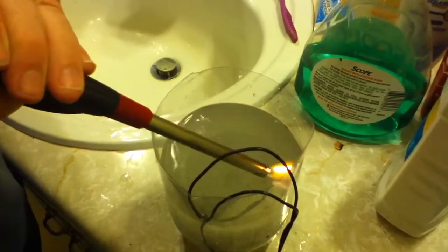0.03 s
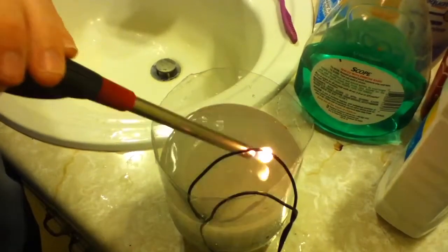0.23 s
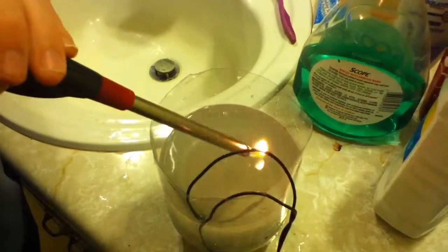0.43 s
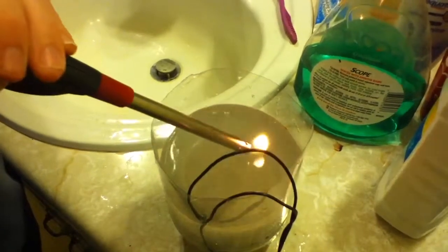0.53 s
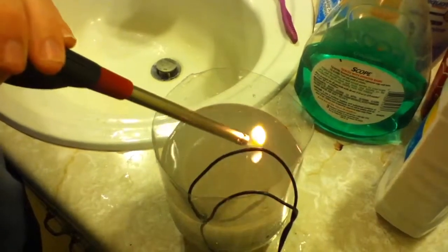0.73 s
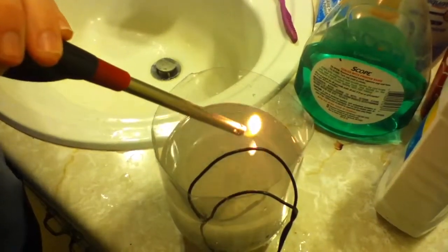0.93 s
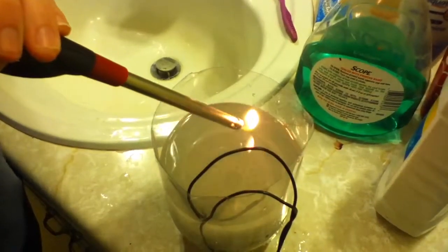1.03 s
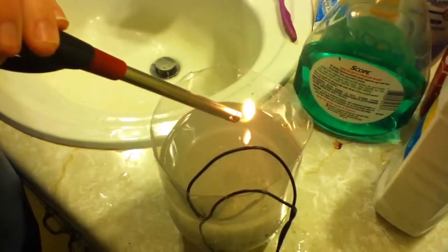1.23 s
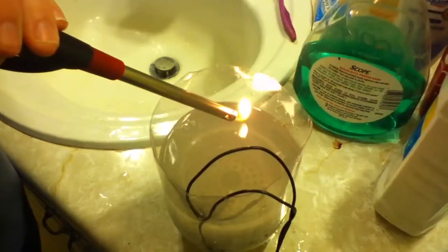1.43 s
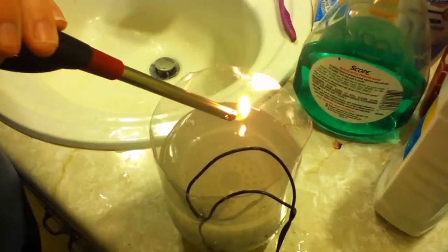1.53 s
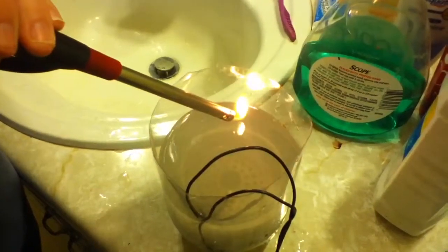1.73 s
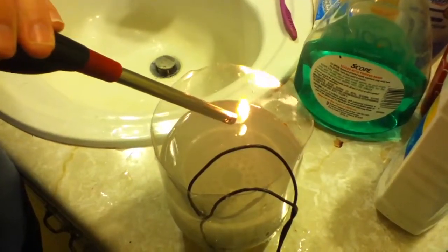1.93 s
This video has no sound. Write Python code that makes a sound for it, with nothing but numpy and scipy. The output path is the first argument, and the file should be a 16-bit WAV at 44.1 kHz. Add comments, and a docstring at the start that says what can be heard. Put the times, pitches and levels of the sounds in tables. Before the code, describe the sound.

One sharp gas bubble pop rings briefly in a small bathroom, followed by faint hiss.

```python
"""Hydrogen bubbles pop under a lighter flame in a plastic cup of water beside a bathroom sink.
Each pop is a brief pressure pulse that rings the cup and the small hard room.
Unlit bubbles fizz and tick faintly; a tiny one snaps near the end.
The loudest pop pushes the automatic gain down, and the hiss of flame and room creeps back."""
import sys
import numpy as np
from scipy import signal
from scipy.fft import rfft, irfft
from scipy.io import wavfile
from scipy.ndimage import uniform_filter1d, minimum_filter1d

SR = 44100
rng = np.random.default_rng(int(sys.argv[2]) if len(sys.argv) > 2 else 0)


def generate_wav(sig):
    """Save sig (samples, or channels by samples) to the path in sys.argv[1] as 16-bit PCM at SR."""
    pcm = np.round(np.clip(np.atleast_2d(sig).T, -1, 1) * 32767).astype(np.int16)
    wavfile.write(sys.argv[1], SR, pcm)


N = 88200
T = np.arange(N) / SR
FREQ_HZ = np.fft.rfftfreq(N, 1 / SR)


def amp(db):
    """Decibels to gain."""
    return 10 ** (np.asarray(db) / 20)


def fade(t60_s):
    """Exponential decay, 60 dB down at t60_s."""
    return np.exp(-np.log(1000) * T / t60_s)


def noise(spectrum):
    """Unit-rms noise shaped by (frequency [Hz], level [dB]) points."""
    hz, db = np.array(spectrum).T
    shape_db = np.interp(np.log(np.maximum(FREQ_HZ, 1)), np.log(hz), db)
    x = irfft(rfft(rng.standard_normal(N)) * amp(shape_db), N)
    return x / x.std()


def wander(rate_hz):
    """Slow random drift, spread near 1."""
    knots = rng.standard_normal(N // 100)
    return np.interp(T * rate_hz, np.arange(len(knots)), knots)


def ring(modes):
    """Decaying sines struck together."""
    return sum(amp(db) * np.sin(2 * np.pi * hz * T) * fade(t60_s) for hz, db, t60_s in modes)


def butter(x, order, hz, kind):
    """Butterworth filter."""
    return signal.sosfilt(signal.butter(order, hz, kind, fs=SR, output="sos"), x)


def at(x, start_s):
    """Shift to a start time."""
    return np.interp(np.arange(N) - round(start_s * SR), np.arange(N), x, left=0, right=0)


# igniting bubbles (time [s], level [dB], low-pass cutoff [Hz])
POPS = [(-0.03, -6.5, 3160), (0.0075, -18.5, 10900), (0.0302, -20, 1200), (0.2130, -15, 8000),
        (0.2213, 8.5, 9550)]
# pressure swing of the flash (frequency [Hz], level [dB], t60 [s])
SHOCK_MODES = [(3450, -9, 0.0013)]
# air and wall resonances of the cup (frequency [Hz], level [dB], t60 [s])
CUP_MODES = [(1007, -14.5, 0.013), (1279, -14, 0.00985), (1604, -17, 0.0095), (2600, -12, .014),
             (3533, -10.5, .017), (4836, -31.5, .012), (6920, -40.5, 0.014), (8050, -32.5, 0.0081),
             (8960, -32.5, 0.021), (12200, -25, .008)]
# pulse scatter around cup and basin (frequency [Hz], level [dB])
SCATTER_SPECTRUM = [(300, -11.5), (1000, 1), (4000, -1.5), (6000, -11.5), (8500, -8.5), (10500, -15.5),
                    (13000, -4)]
# thump of expanding gas (frequency [Hz], level [dB], t60 [s])
PUFF_MODES = [(204, -43.5, .022), (471, -42, .025)]


def pops(room):
    """Each flash thumps, rings the cup, reflects off the basin and fills the room; slow burns are duller."""
    scatter = amp(-21) * noise(SCATTER_SPECTRUM) * fade(t60_s=0.034)
    pulse = ring(SHOCK_MODES) + ring(CUP_MODES) + scatter
    direct = butter(pulse, 5, 924, "high")  # a small source radiates little bass
    basin = amp(-13) * at(direct, start_s=0.0034)
    pop = direct + ring(PUFF_MODES) + basin + amp(-31.5) * room
    return sum(amp(db) * at(butter(pop, 2, cutoff_hz, "low"), start_s) for start_s, db, cutoff_hz in POPS)


# room echo colour (frequency [Hz], level [dB])
ROOM_SPECTRUM = [(150, -20), (460, -9), (680, -12), (950, 2.5), (1300, 1.5), (1900, -6.5), (2150, -2),
                 (2330, 3.5), (2900, -4), (3250, -5), (3600, 1), (4200, -8), (4750, -6.5), (5600, -20),
                 (8300, -12.5), (15000, -14)]
# reverberation time (frequency [Hz], t60 [s])
ROOM_DECAY = [(300, .45), (1100, 0.46), (2400, 0.47), (4000, 0.43), (8000, .27), (14000, .22)]
# lingering basin and wall resonances (frequency [Hz], level [dB], t60 [s])
ROOM_MODES = [(1088, -17, .5), (2240, -13, .4), (2340, -12, .55), (2420, -17.5, .55), (3610, -15.5, 0.42)]


def bathroom(lag_s=0.0032):
    """Impulse response of hard walls: dense echo, treble dying first, a few lingering modes."""
    spectrum = rfft(noise(ROOM_SPECTRUM))
    hz, t60_s = np.array(ROOM_DECAY).T
    edges_hz = np.geomspace(50, 20000, 19)
    tail = ring(ROOM_MODES)
    for lo, hi in zip(edges_hz, edges_hz[1:]):
        band = irfft(spectrum * ((FREQ_HZ >= lo) & (FREQ_HZ < hi)), N)
        tail += band * fade(np.interp(np.sqrt(lo * hi), hz, t60_s))
    onset = np.clip(T / lag_s - 1, 0, 1)
    return tail * onset


# murmur of room and flame (frequency [Hz], level [dB])
RUMBLE_SPECTRUM = [(20, -12), (45, -11), (62, -4.5), (100, -1), (160, -1.5), (250, -4.5), (420, -10),
                   (800, -17.5), (2000, -36)]
# gas hiss (frequency [Hz], level [dB])
HISS_SPECTRUM = [(200, 0.5), (900, 4), (1700, 2.5), (4000, 1), (6000, 0), (8000, 1), (11000, -1),
                 (15500, -6)]


def flame(rumble_flutter_db=1.8, hiss_flutter_db=1):
    """The lighter flame flutters low with the room's murmur; its gas hisses almost evenly."""
    rumble = noise(RUMBLE_SPECTRUM) * amp(-59.5 + rumble_flutter_db * wander(rate_hz=25))
    hiss = noise(HISS_SPECTRUM) * amp(-60 + hiss_flutter_db * wander(rate_hz=8))
    return rumble + hiss


# dry foam ticks (time [s], level [dB])
TICKS = [(0.399, -47), (0.661, -48), (1.609, -45)]
# small unlit bursts (time [s], pitch [Hz], level [dB], length [s])
FIZZ = [(0.55, 8950, -56, 0.012), (1.544, 6530, -58, 0.012), (1.58, 7280, -61, 0.025)]


def foam():
    """Unlit bubbles burst with short narrow-band sizzles and dry ticks."""
    out = np.zeros(N)
    for start_s, hz, db, length_s in FIZZ:
        sizzle = noise([(hz / 2, -40), (hz * 0.88, -14), (hz, 0), (hz * 1.12, -14), (hz * 2, -40)])
        swell = np.sin(np.pi * np.minimum(T / length_s, 1))
        out += amp(db) * at(sizzle * swell, start_s)
    for start_s, db in TICKS:
        tick = noise([(1500, -18), (6000, -2), (14000, 2)]) * fade(t60_s=0.0072)
        out += amp(db) * at(tick, start_s)
    return out


# resonances of the snap (frequency [Hz], level [dB], t60 [s])
SNAP_MODES = [(3140, -11, 0.015), (3300, -5, 0.025), (4780, -6.5, .012), (5300, -4, .024),
              (7670, -5.5, 0.016), (8370, -8, 0.028), (10400, -14, .007)]
# colour of its crack (frequency [Hz], level [dB])
CRACK_SPECTRUM = [(2000, -26.5), (3100, 0), (8500, -4), (10800, -13), (11800, -24)]


def snap(room, start_s=1.9059, band_hz=(2830, 11000)):
    """A tiny bubble goes off with a thin, bright crack and a trace of echo."""
    crack = amp(-1) * noise(CRACK_SPECTRUM) * fade(t60_s=0.013)
    click = butter(ring(SNAP_MODES) + crack, 4, band_hz, "band")
    echo = signal.fftconvolve(click, room / np.linalg.norm(room))[:N]
    return amp(-36) * at(click + amp(-16) * echo, start_s)


def scene():
    """Pops, flame, foam and snap in mono."""
    room = bathroom()
    return (pops(room) + flame() + foam() + snap(room))[None]


def record(dry, ceiling_db=-4, recovery_db_per_s=4, attack_s=0.0015, cutoff_hz=15800):
    """Gain control ducks fast on peaks above the ceiling and recovers slowly; a steep low-pass follows."""
    over_db = np.maximum(20 * np.log10(np.abs(dry[0]) + 1e-9) - ceiling_db, 0)
    recovery_db = recovery_db_per_s * T
    duck_db = np.maximum.accumulate(over_db + recovery_db) - recovery_db
    attack_samples = int(attack_s * SR)
    held_gain = minimum_filter1d(amp(-duck_db), 2 * attack_samples)
    gain = uniform_filter1d(held_gain, attack_samples)
    lowpass = signal.ellip(10, 0.2, 70, cutoff_hz, fs=SR, output="sos")
    return signal.sosfilt(lowpass, dry * gain)


dry = scene()
out = record(dry)
generate_wav(out)
```